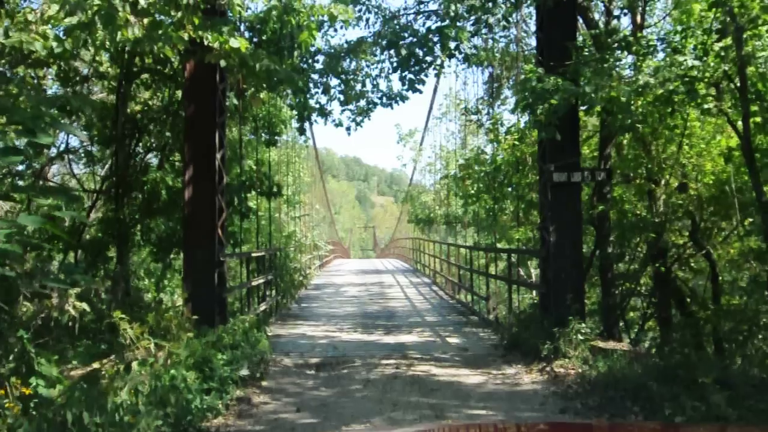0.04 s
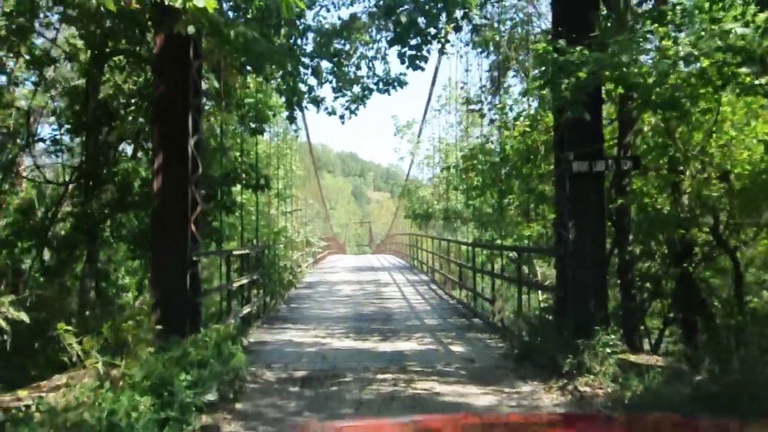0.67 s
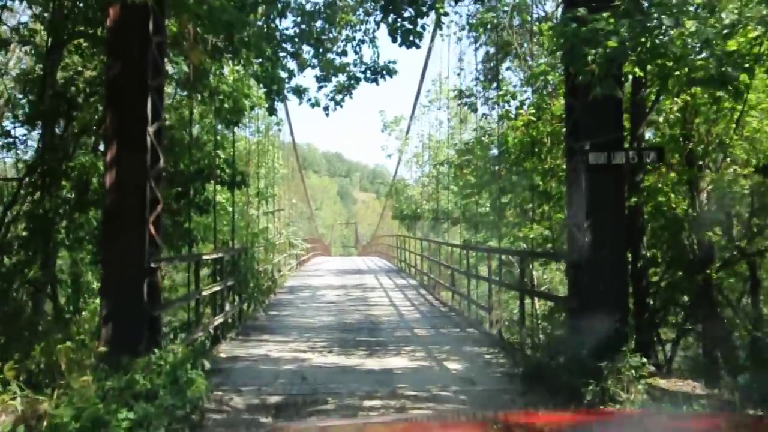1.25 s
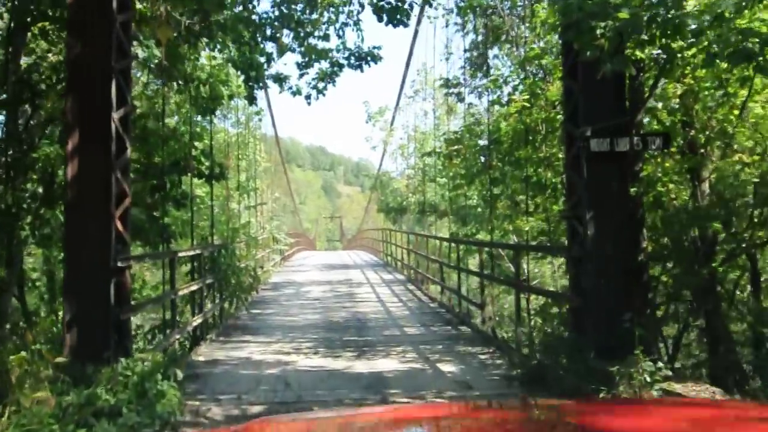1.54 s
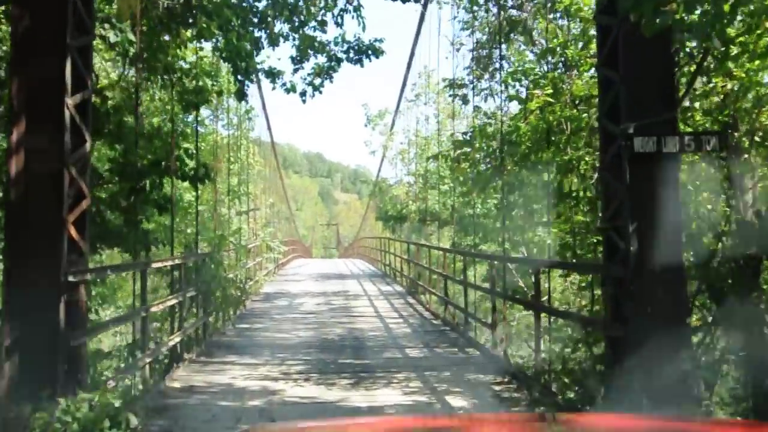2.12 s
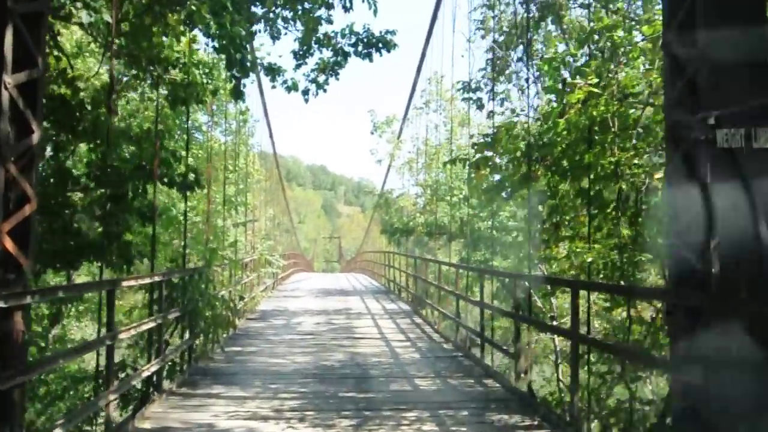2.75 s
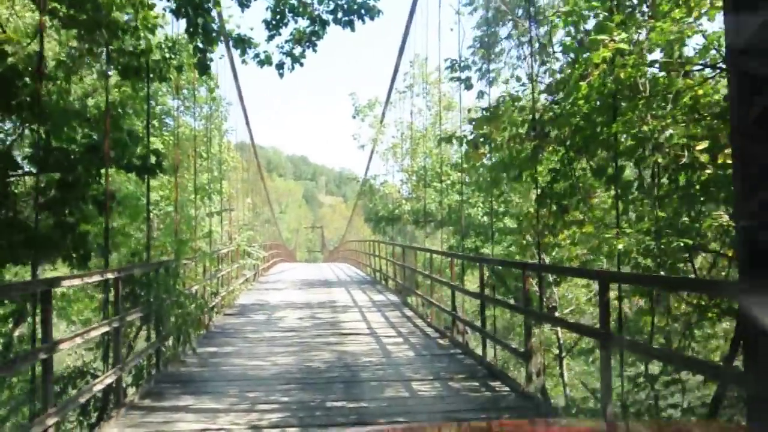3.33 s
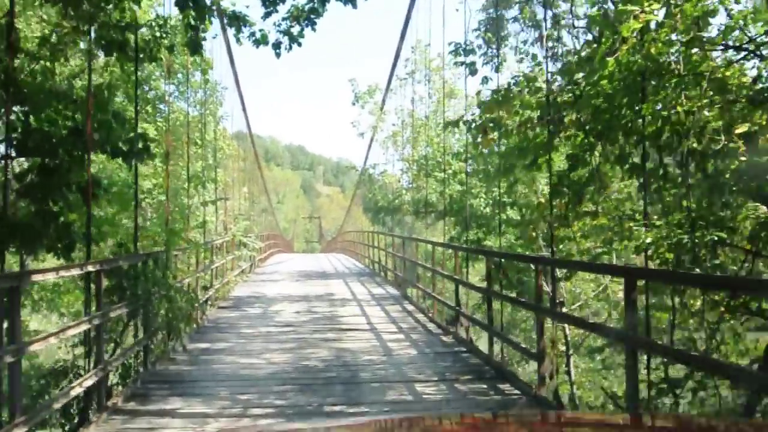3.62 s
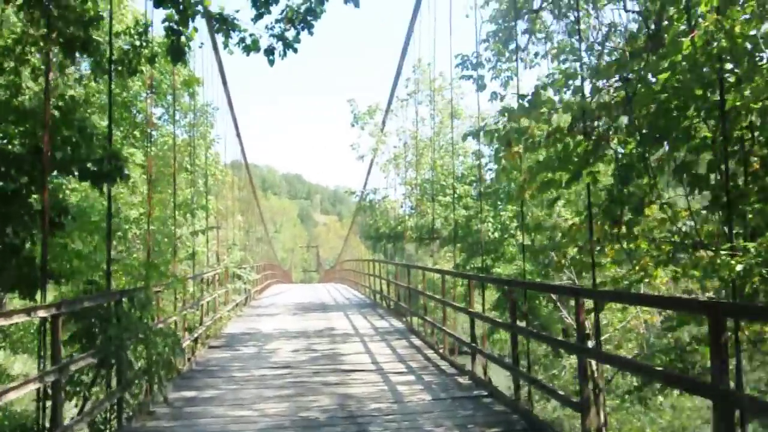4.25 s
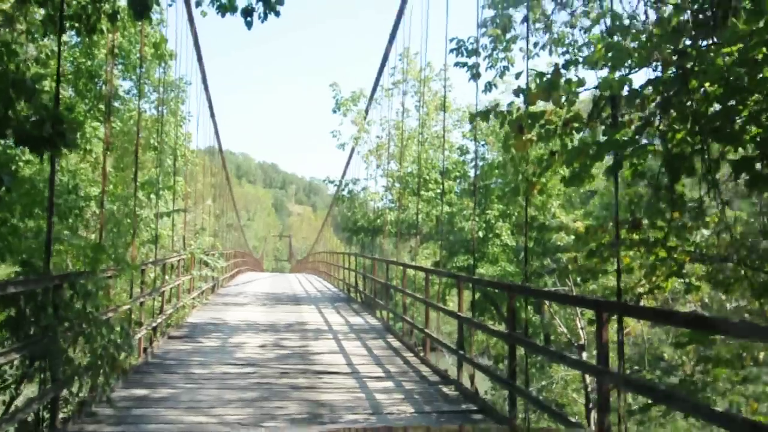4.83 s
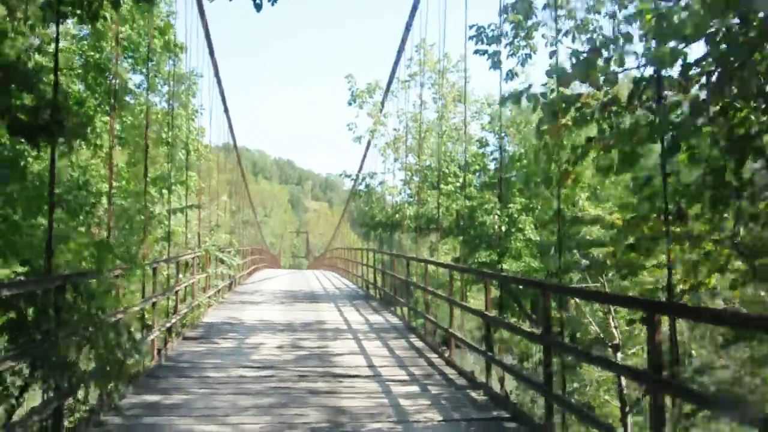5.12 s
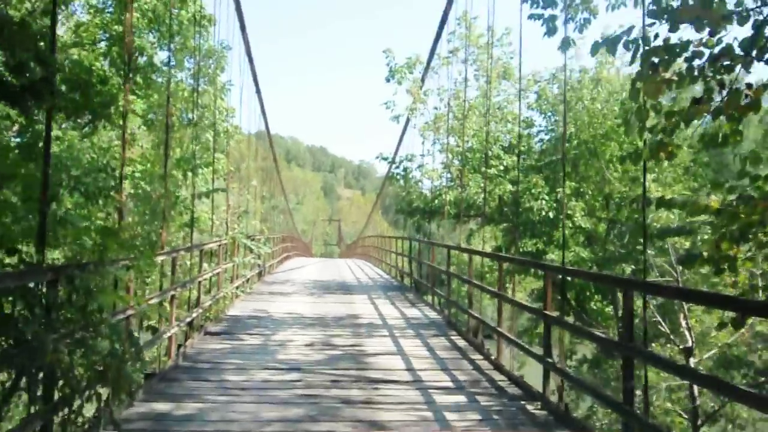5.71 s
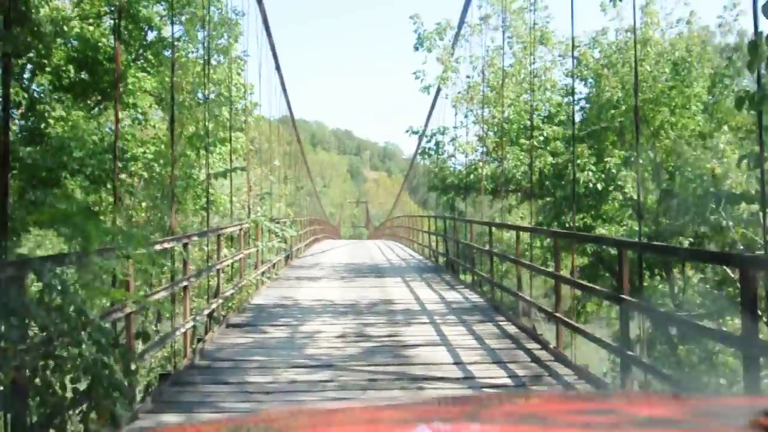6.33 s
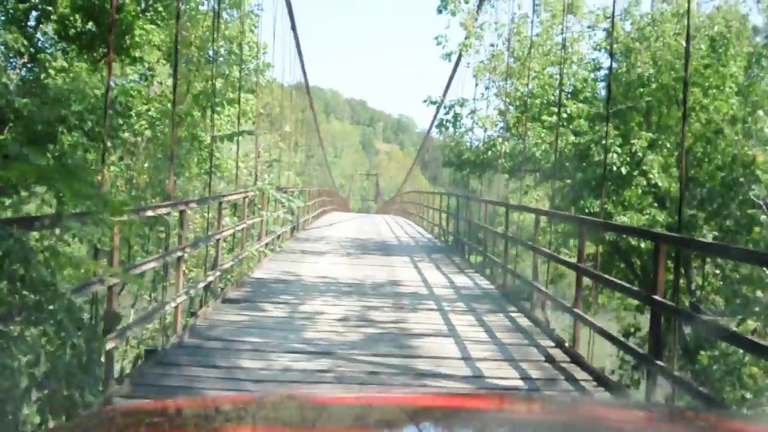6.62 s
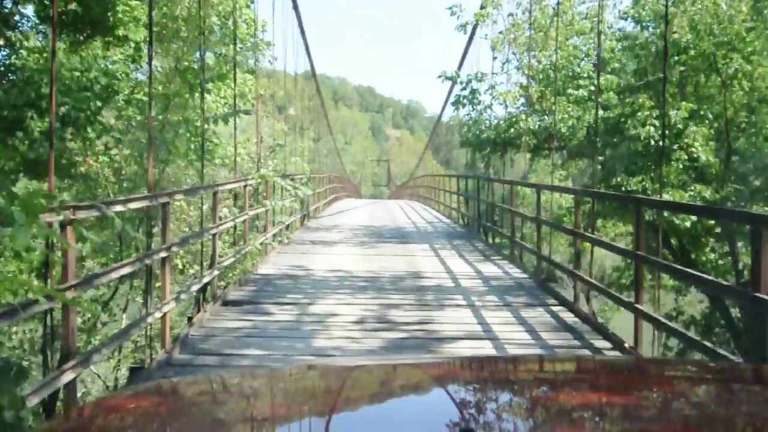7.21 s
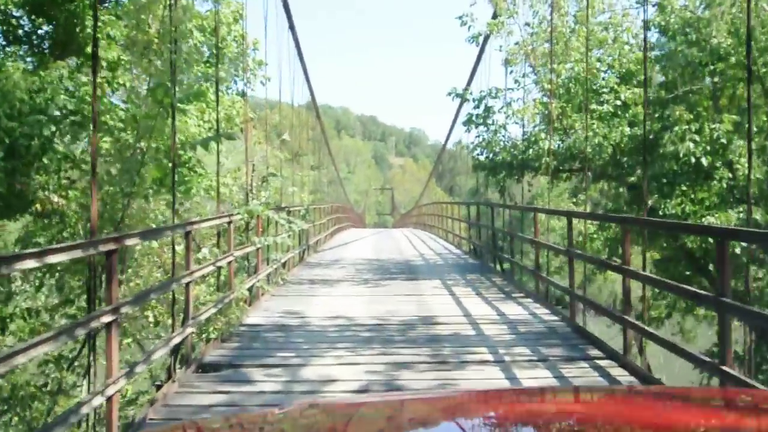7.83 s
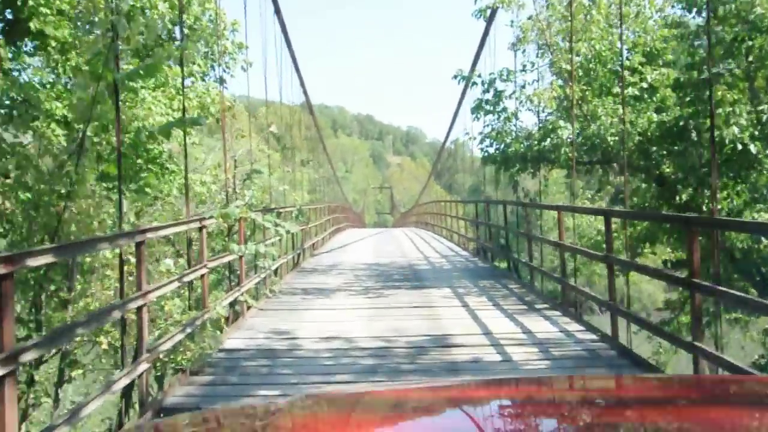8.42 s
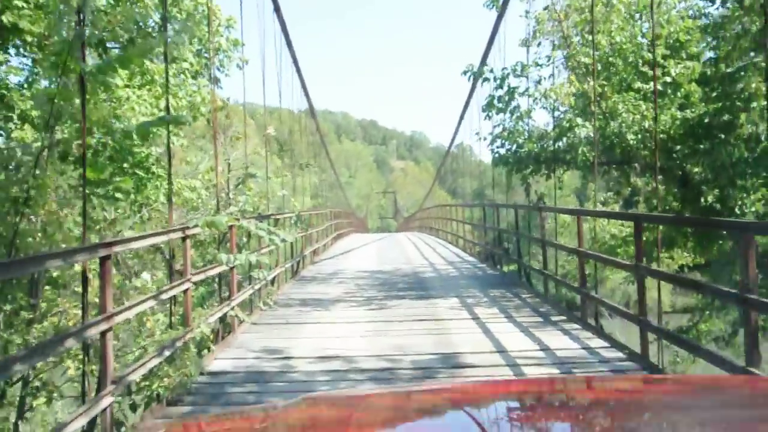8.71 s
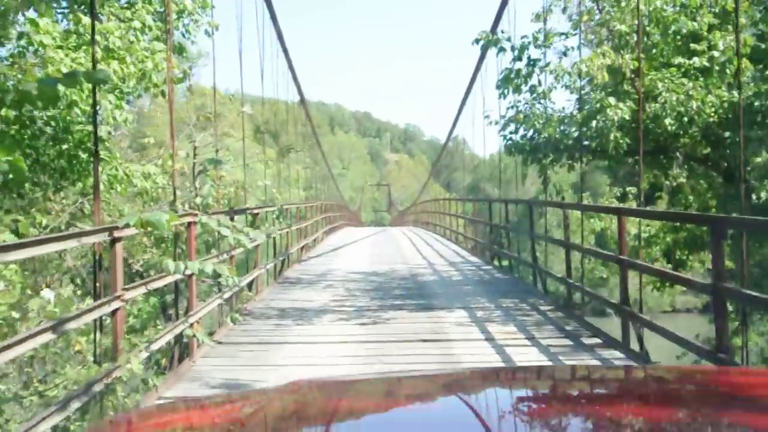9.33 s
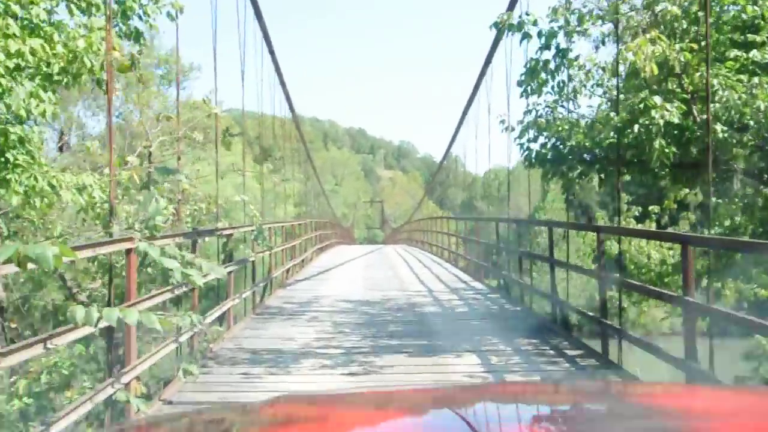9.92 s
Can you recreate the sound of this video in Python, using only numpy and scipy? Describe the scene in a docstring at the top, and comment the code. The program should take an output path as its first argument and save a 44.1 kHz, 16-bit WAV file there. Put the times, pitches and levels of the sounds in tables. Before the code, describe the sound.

Inside a slowly moving car, a low engine drone and cabin rumble run steadily while grit crunches faintly under the tyres. Something small pops under a wheel, then the first planks of a wooden bridge knock softly. From about halfway, loose boards slam and bounce one after another, with clinking bolts, building to a dense clatter. The microphone sounds dull and distorts slightly on the hardest blows.

```python
"""A car creeps onto a suspension bridge decked with loose wooden planks, heard from inside. Engine drone and
cabin rumble run throughout; grit crunches on the approach and slowly fades. Near two seconds iron ticks, a
board knocks faintly and a stone or twig pops under a tyre; then more planks knock. From five seconds on the
tyres tip plank after plank: they slam on the beams, bounce and shake their bolts while the whole deck builds to
a clatter. The hardest blows overload a dull little microphone."""
import sys
import numpy as np
from scipy import signal
from scipy.fft import rfft, irfft, next_fast_len
from scipy.io import wavfile
from scipy.ndimage import uniform_filter1d, map_coordinates

SR = 44100
rng = np.random.default_rng(int(sys.argv[2]) if len(sys.argv) > 2 else 0)


def wrap_up_sound(samples):
    """Save the sound to the file named by the first command line argument, as 16-bit audio."""
    columns = np.atleast_2d(samples).T
    # keep every value between -1 and 1, then stretch to whole-number steps
    tamed = np.clip(columns, -1, 1)
    steps = np.round(tamed * 32767).astype(np.int16)
    wavfile.write(sys.argv[1], SR, steps)


N = 439236

# engine speed and load: time_s, firing_hz, drone_db
ENGINE_MOVES = [(0, 45.5, -60), (.7, 44.7, -49), (1.15, 42.88, -50), (1.9, 46.08, -48.5), (2.4, 45.32, -47),
                (3.3, 39.96, -45.5), (3.9, 40.22, -53.5), (4.7, 42.07, -41.5), (5.15, 42.44, -55),
                (6.6, 45, -44), (7.6, 46, -53.5), (9.96, 45.7, -45)]
# partials of the drone: firing_multiple, level_db
ENGINE_ORDERS = [(1, 3), (1.5, -3.5), (2, -2.5), (3, -5.5), (3.5, 0.5), (4.5, -3.5)]
# boom of the car body: frequency_hz, level_db
BOOM_COLOUR = [(15, -9.5), (25, -2.5), (45, -5), (65, 1.5), (82, -11), (115, -2.5), (150, 0.5), (208, 0),
               (238, -13), (270, -1.5), (340, -8), (400, -6.5), (600, -39)]
# rush of air and tyres: frequency_hz, level_db
RUSH_COLOUR = [(150, -22.5), (280, -0.5), (400, -5), (520, -0.5), (750, -3.5), (1100, -6.5), (1400, -16),
               (2100, -18), (2700, -17), (4000, -19.5), (5200, -20.5), (7000, -29)]
# crunch of one grain: frequency_hz, level_db
GRIT_COLOUR = [(300, -13), (750, 0.5), (1200, -3), (2200, -12.5), (4500, -12.5), (7000, -19)]
# loose ironwork clinking: start_s, level_db, pitch_hz, ringing_share (0-1)
IRON_HITS = [(1.695, -38, 4430, 0.08), (1.721, -40.5, 2820, 0), (1.777, -34.5, 4260, 0.03),
             (4.541, -42.5, 4480, 0), (4.967, -35.5, 2266, 0.6), (5.139, -24, 4250, 0.2),
             (6.543, -16.5, 2580, 0.2), (6.559, -14.5, 3150, 0.4), (7.287, -25.5, 2700, 0.2),
             (7.504, -24, 3445, 1), (7.617, -17, 3200, 0.1), (7.686, -17, 3056, 0.85),
             (8.246, -25.5, 3200, 0.8), (9.461, -17, 3330, 0.5)]
# scrape of iron: pitch_multiple, level_db
SCRAPE_COLOUR = [(0.328, -18.5), (.8, -6), (1, 3), (2, -7.5)]
# a faint plank knock (1.833 s), a stone or twig popping under a tyre on the approach (1.871 s), then more
# planks knock and slam: # start_s, knock_db, pitch_hz, clack_db, rattle_db (relative to the blow)
TYRE_HITS = [(1.833, -39, 900, -50, -3.5), (1.871, -21.5, 740, -39, -19.5), (2.625, -37.5, 510, -54, -18.5),
             (2.876, -30.5, 554.5, -48, -11.5), (3.106, -36, 522, -61, -21.5), (3.477, -38, 570, -54, -7.5),
             (3.992, -36, 800, -50, -5.5), (4.233, -31.5, 770, -50, -.5), (4.279, -31.5, 741, -43.5, -7.5),
             (4.385, -33.5, 830, -50, -8.5), (4.438, -24, 629, -39, -3.5), (4.474, -34.5, 631, -44, .5),
             (4.864, -27, 537, -48, -3.5), (4.89, -27.5, 555, -41.5, -7.5),
             (5.137, -9.5, 885, -23.5, -16.5), (5.312, -27.5, 735, -52, -9.5),
             (5.524, -22.5, 842, -33.5, -11.5), (5.568, -15.5, 905, -22, -9.5),
             (5.582, -14.5, 748, -29, -5.5), (5.751, -17, 1090, -21.5, -11.5),
             (5.782, -22, 881, -37, -13.5), (5.87, -22, 1010, -47, -13.5), (5.948, -14, 1070, -16.5, -11.5),
             (6.012, -21, 1070, -31, -9.5), (6.026, -17.5, 882, -23, -11.5),
             (6.058, -13.5, 940, -26, -10.5), (6.131, -17, 795, -32, -3.5),
             (6.203, -13.5, 1046, -13, -14.5), (6.276, -24, 862, -55, -7.5), (6.382, -21.5, 820, -29, -6.5),
             (6.455, -19.5, 689, -29, -2.5), (6.485, -17.5, 758, -22, -5.5), (6.634, -17.5, 725, -23, -2.5),
             (6.739, -25, 720, -31, -6.5), (6.75, -15.5, 668, -32.5, -14.5),
             (6.807, -17, 787, -39.5, -25.5), (6.88, -11, 693, -22, -9.5), (7.014, -22.5, 610, -61, -4.5),
             (7.059, -28.5, 757, -39, 2.5), (7.25, -9.5, 763.5, -18, -10.5), (7.4, -15.5, 685, -24, -8.5),
             (7.444, -22.5, 763, -30, -6.5), (7.469, -13, 734, -16, -4.5), (7.599, -17, 1030, -27, -10.5),
             (7.669, -23, 727, -18.5, -8.5), (7.688, -21, 886, -22, -4.5), (7.755, -17, 948, -17.5, -11.5),
             (7.774, -21.5, 822, -22, -6.5), (7.921, -25.5, 763, -17.5, -19.5),
             (7.965, -13, 694, -32, -7.5), (8.074, -18.5, 643, -49, -6.5), (8.137, -18, 810, -27.5, -6.5),
             (8.172, -19.5, 646, -46, -3.5), (8.341, -17, 748, -23, -5.5), (8.371, -18, 754, -25.5, -12.5),
             (8.56, -13.5, 772, -30, -8.5), (8.575, -18, 806, -27, -12.5), (8.628, -18, 1007, -21.5, -11.5),
             (8.654, -17.5, 906, -22, -6.5), (8.75, -15.5, 784, -20.5, -5.5), (8.81, -16.5, 704, -25, -5.5),
             (8.911, -22.5, 785, -16, -9.5), (9.103, -21, 990, -27, -5.5), (9.121, -18.5, 823, -22, -2.5),
             (9.277, -20, 742, -36.5, -1.5), (9.321, -19, 840, -30, -.5), (9.461, -19, 893, -23.5, -5.5),
             (9.532, -14.5, 800, -24.5, -3.5), (9.574, -19, 785, -37, -11.5), (9.653, -14, 713, -30, -1.5),
             (9.689, -21, 833, -24.5, -9.5), (9.751, -15, 680, -31, -14.5), (9.807, -19.5, 817, -27, -6.5),
             (9.894, -17.5, 1017, -25, -5.5)]
# hollow knock of a mid-sized plank: frequency_hz, level_db
KNOCK_COLOUR = [(150, -33), (330, -2), (500, 1), (780, 1), (1000, -11.5), (1300, 1), (1650, -16.5),
                (2500, -17.5), (6000, -30.5)]
# ring of a mid-sized plank: pitch_hz, level_db, t60_s
WOOD_MODES = [(380, -8.5, 0.055), (537.3, -9, 0.11), (664, -6.5, .06), (832.4, -3, 0.1), (947, 3, 0.042),
              (1151.4, -2, 0.063), (1357, -13.5, 0.017), (1694, -14, 0.047)]
# clack of wood on steel: frequency_hz, level_db
CLACK_COLOUR = [(700, -45.5), (1300, -1.5), (1800, -0.5), (2600, 1.5), (2900, -3), (3200, -1.5), (3600, -4),
                (4400, -8), (5500, -13), (7000, -22.5)]
# ring of the bolts: pitch_hz, level_db, t60_s
BOLT_MODES = [(1890, -5, 0.2), (2263, 5, 0.038), (2550, -3.5, 0.056), (2840, -4.5, 0.047),
              (3045, -8.5, 0.24), (3120, -3.5, 0.18), (3290, -12.5, .11), (3486, -5, 0.079),
              (4520, -14.5, 0.053)]
# thud on a beam: frequency_hz, level_db
THUD_COLOUR = [(40, -37.5), (100, -13.5), (150, -3), (210, 2), (300, -6), (420, -9.5), (700, -16),
               (2000, -61)]
# how hard the tyres shake the deck: time_s, level_db
DECK_SHAKE = [(4.25, -46), (5.1, -40.5), (5.9, -34.5), (6.15, -28.5), (6.6, -27), (6.98, -33.5),
              (7.25, -27.5), (7.55, -23), (8.05, -27), (8.4, -22), (9.0, -23.5), (9.15, -23), (9.35, -25),
              (9.6, -21.5), (9.96, -22)]
# response of the dull microphone: frequency_hz, gain_db
MIC_RESPONSE = [(20, -0.5), (4700, -0.5), (5200, -4), (5600, -11.5), (6000, -20.5), (6400, -47.5),
                (7000, -75)]

TIME, RING_TIME = np.arange(N) / SR, np.arange(SR // 8) / SR  # seconds: the scene, one hit
BLOW_DB, BOARD_HZ, RATTLE_DB = -20, 800, -8.5  # an ordinary slam on a mid-sized plank


def amp(db):
    """Decibels to gain."""
    return 10 ** (np.asarray(db) / 20)


def unit(x):
    """Scale to rms 1."""
    return x / np.sqrt(np.mean(x ** 2) + 1e-20)


def unit_attack(x):
    """Scale a hit so that its first 14 ms have rms 1."""
    return x / np.sqrt(np.mean(x[:round(.014 * SR)] ** 2) + 1e-20)


def curves(rows):
    """One automation curve for each column after the time."""
    times, *columns = np.transpose(rows)
    return [np.interp(TIME, times, column) for column in columns]


def wobble(rate):
    """A smooth random drift, rate knots a second."""
    knots = rng.standard_normal(int(N * rate / SR) + 4)
    return map_coordinates(knots, [TIME * rate])


def equalise(x, colour):
    """EQ through (Hz, dB) points joined on a log axis."""
    size = next_fast_len(len(x) + 2048)
    hz, db = np.transpose(colour)
    gain = amp(np.interp(np.log(np.fft.rfftfreq(size, 1 / SR) + 1), np.log(hz), db))
    return irfft(rfft(x, size) * gain, size)[:len(x)]


def noise(colour, length=N):
    """Coloured noise of rms 1."""
    return unit(equalise(rng.standard_normal(length), colour))


def decay(t60):
    """The tail of a hit, falling 60 dB in t60 seconds."""
    return np.exp(-np.log(1000) * RING_TIME / np.maximum(t60, .004))


def burst(colour, t60):
    """A noise hit: crowded, fast-dying modes, too many to tell apart."""
    return unit_attack(noise(colour, len(RING_TIME)) * decay(t60))


def ring(modes, pitch, hold):
    """The tones of a struck piece in a fresh balance; pitch transposes them, hold stretches the tail."""
    hz, db, t60 = np.transpose(modes)[:, :, None]
    strength, phase = rng.standard_normal((2, len(hz), 1))
    partials = amp(db + 4.9 * strength) * np.sin(2 * np.pi * (hz * pitch * RING_TIME + phase))
    return unit_attack(np.sum(partials * decay(t60 * hold), axis=0))


def placed(times, hits):
    """Lay the hits on the timeline."""
    at = np.round(times * SR).astype(int)[:, None] + np.arange(hits.shape[1])
    return np.bincount(at.ravel(), hits.ravel(), N)[:N]


def scatter(pieces, per_s, spread_db):
    """Loose pieces, each struck at its own random times, per_s hits a second in all; rms 1."""
    texture = np.zeros(N)
    for piece in pieces:
        gap, strength, polarity = rng.random((400, 3)).T
        times = np.cumsum(2 * gap) * len(pieces) / per_s
        gains = amp(spread_db * strength) * np.sign(polarity - .5)
        heard = times < N / SR
        texture += placed(times[heard], gains[heard, None] * piece)
    return unit(texture)


def engine():
    """A slow, uneven firing drone; a belt-driven pulley whines faintly along with it."""
    firing_hz, drone_db = curves(ENGINE_MOVES)
    firings = np.cumsum(firing_hz * (1 + 0.035 * wobble(13))) / SR
    drone = sum(amp(db + 3.2 * wobble(12)) * np.sin(2 * np.pi * k * firings) for k, db in ENGINE_ORDERS)
    whine = np.sin(2 * np.pi * 9 * np.cumsum(firing_hz) / SR)
    return amp(drone_db) * drone + amp(-50.5 + 2 * wobble(5)) * whine


def cabin():
    """The body booms softly under a steady rush of air and tyre noise."""
    boom = amp(-42 + 0.64 * wobble(6)) * noise(BOOM_COLOUR)
    rush = amp(-44 + 0.82 * wobble(7.1)) * noise(RUSH_COLOUR)
    return boom + rush


def grit():
    """Grains crunch faintly under the tyres, fading as the dirt gives way to boards."""
    grains = [burst(GRIT_COLOUR, t60=0.022) for _ in range(16)]
    return amp(-50.5 - 2.5 * TIME) * scatter(grains, per_s=200, spread_db=13)


def ironwork():
    """Washers and hanger rods scrape and clink; light touches only tick, hard ones ring."""
    clinks = []
    for _, level_db, hz, ringing in IRON_HITS:
        t60 = 0.071 + .0017 * (level_db - BLOW_DB)
        scrape = burst([(hz * k, db) for k, db in SCRAPE_COLOUR], 1.1 * t60)
        modes = [(hz, 0, t60), (hz * 1.06, -4, t60), (hz * 1.35, -9, t60 / 2), (hz * 1.8, -7, t60 / 2)]
        clink = np.sqrt(1 - ringing) * scrape + np.sqrt(ringing) * ring(modes, pitch=0.96, hold=1)
        clinks.append(amp(level_db) * unit_attack(clink * (1 - np.exp(-RING_TIME / 0.0013))))
    return placed(np.array(IRON_HITS)[:, 0], np.array(clinks))


def knock(hz, hold, padding_db):
    """The hollow voice of one board; short boards knock higher, a padded contact loses its overtones."""
    pitch = hz / 820
    body = burst([(f * pitch, db) for f, db in KNOCK_COLOUR], 0.064 * hold)
    tones = 1.05 * ring(WOOD_MODES, pitch, 0.82 * hold)
    muffle = [(.5 * hz, -padding_db / 2), (.75 * hz, 0), (1.16 * hz, 0), (1.7 * hz, -padding_db)]
    wood = equalise(body + tones, muffle)
    return unit_attack(wood * (1 - np.exp(-RING_TIME / 0.0012)))  # the board takes a moment to seat


def clack(hz, hold):
    """Wood against a steel bolt; a higher hz tilts the sound brighter, like a harder contact."""
    tilt_db_per_octave = 13 * np.log2(hz / 2700)
    tilted = [(f, db + tilt_db_per_octave * np.log2(f / 2700)) for f, db in CLACK_COLOUR[1:]]
    snap = burst([CLACK_COLOUR[0]] + tilted, 0.058 * hold)
    tones = 0.23 * ring(BOLT_MODES, 1 + 0.0055 * rng.standard_normal(), hold)
    onset = 1 - np.exp(-(RING_TIME / .0012) ** 2)  # the bolt is met just after the beam
    return unit_attack((snap + tones) * onset)


def thud():
    """The low push of a blow on a beam, carried up through the wheels."""
    return unit_attack(burst(THUD_COLOUR, t60=0.17) * (1 - np.exp(-RING_TIME / 0.0002)))


def rattle(board, level_db):
    """Small, uneven bounces ring the same board again as it settles."""
    bounces = rng.standard_normal(len(board)) * (rng.random(len(board)) < 450 / SR)
    bounces *= decay(t60=0.22) * np.clip(RING_TIME / 0.0097 - .5, 0, 1)
    bounces *= amp(level_db) / (np.linalg.norm(bounces) + 1e-9)
    return signal.fftconvolve(board, bounces)[:len(board)]


def pop_and_planks():
    """A faint knock, a stone or twig pop, then planks tip; each hit layers a knock, a clack, a rattle and a
    thud."""
    hits = []
    for _, knock_db, hz, clack_db, rattle_db in TYRE_HITS:
        loose_db = rattle_db - RATTLE_DB
        hold = np.clip(1.094 * np.exp(0.02 * loose_db), .5, 1.6)  # a well-seated board stops dead
        padding_db = np.clip(0.95 * (knock_db - clack_db - 12.5), 0, 12)  # weak clack: wood on wood
        wood = amp(knock_db) * knock(hz, hold, padding_db)
        bolt_hz = 2700 * np.exp(0.039 * rng.standard_normal())
        strike = wood + amp(clack_db) * clack(bolt_hz, hold)
        # hard blows, loose planks and long, low planks all land with more weight
        thud_db = -31 + 0.68 * (knock_db - BLOW_DB) + .5 * loose_db - 14 * np.log2(hz / BOARD_HZ)
        hits.append(strike + rattle(strike, rattle_db) + amp(thud_db) * thud())
    return placed(np.array(TYRE_HITS)[:, 0], np.array(hits))


def jolt_db(settle_s=0.06, floor_db=-27.5):
    """The shaking jumps after each hit and settles in the gaps; hits under floor_db hardly stir it."""
    start_s, knock_db = np.transpose(TYRE_HITS)[:2]
    settling = np.exp(-np.arange(SR // 2) / SR / settle_s)
    energy = placed(start_s, amp(2 * knock_db)[:, None] * settling) + amp(2 * floor_db)
    swing_db = 10 * np.log10(energy / uniform_filter1d(energy, size=SR // 3))
    return 0.23 * np.clip(swing_db, -7, 7)


def deck():
    """The tyres drum on the deck; that one shaking drives distant boards, fittings and beams."""
    shake_db, = curves(DECK_SHAKE)
    approach_db = np.clip(30 * (TIME - DECK_SHAKE[0][0]), -16, 0)  # swells as the loose boards near
    drive_db = shake_db + approach_db + jolt_db() + 25  # about 0 at full shake
    boards = [knock(770 * np.exp(0.1577 * z), hold=2.3, padding_db=0) for z in rng.standard_normal(24)]
    fittings = [clack(2750 * np.exp(0.073 * z), hold=1.82) for z in rng.standard_normal(20)]
    beams = [thud() for _ in range(10)]
    clatter = amp(-23.5 + 1.02 * drive_db) * scatter(boards, per_s=100, spread_db=14)
    chatter = amp(-33 + 1.24 * drive_db) * scatter(fittings, per_s=70, spread_db=14.5)
    rumble = amp(-29 + 0.49 * drive_db) * scatter(beams, per_s=170, spread_db=6.5)
    return clatter + chatter + rumble


def scene():
    """The mono mix inside the car."""
    return (grit() + pop_and_planks() + ironwork() + deck() + engine() + cabin())[None]


def record(dry):
    """A dull microphone rounds off strong peaks, its input clips on the hardest, and the top is cut."""
    rounded = dry[0] / (1 + np.abs(dry[0] / 1.3) ** 3) ** (1 / 3)
    clipped = np.clip(equalise(rounded, MIC_RESPONSE), -.71, .71)
    passband = np.fft.rfftfreq(N, 1 / SR) < 15800
    return irfft(rfft(clipped) * passband, N)[None]


dry = scene()
out = record(dry)
wrap_up_sound(out)
```